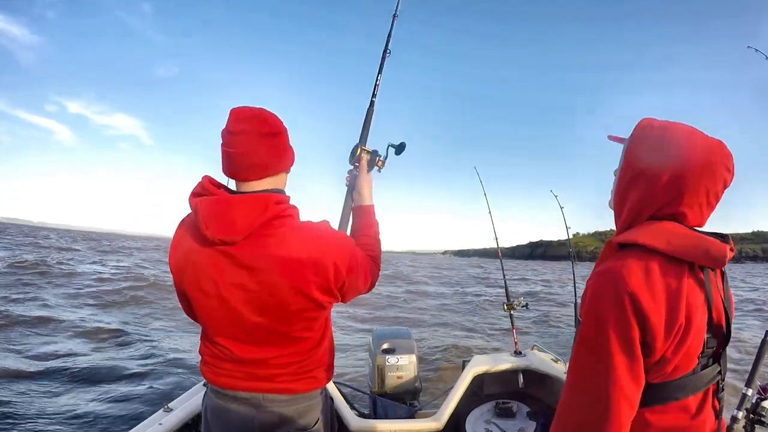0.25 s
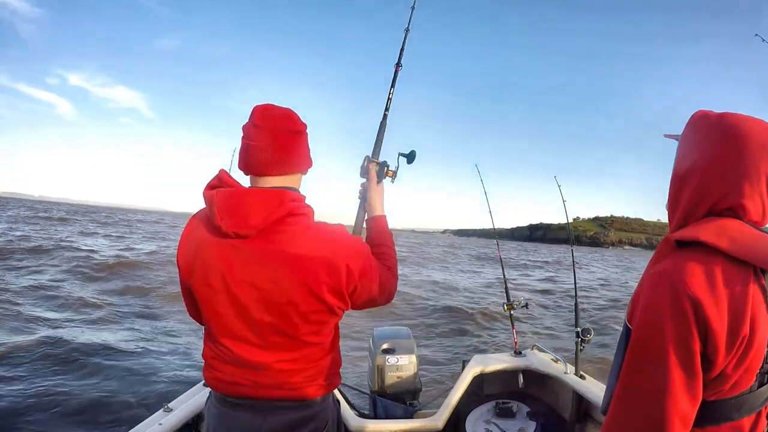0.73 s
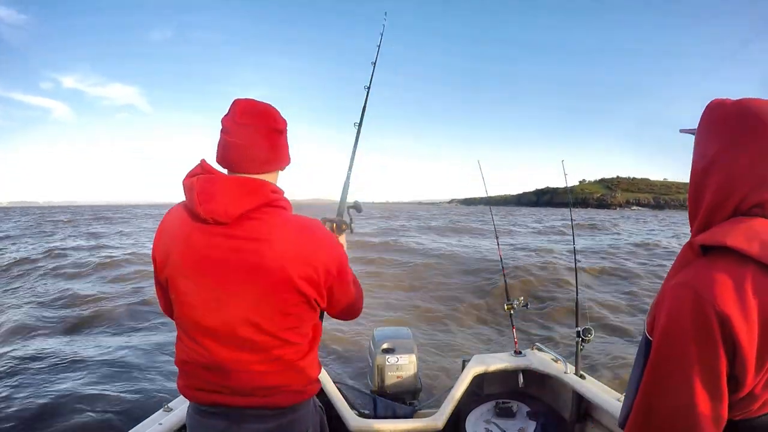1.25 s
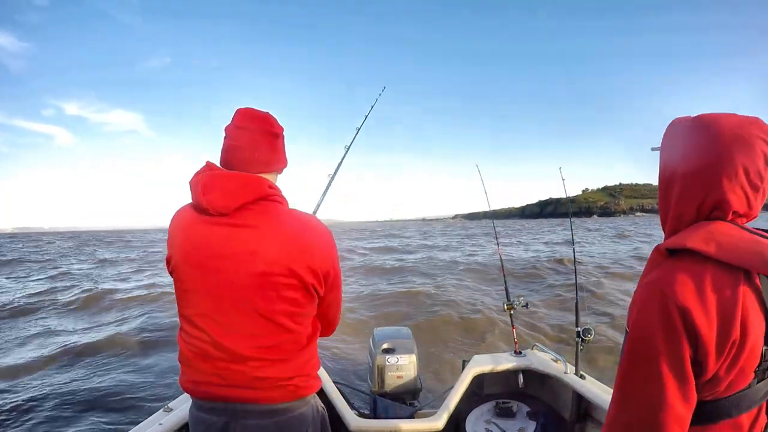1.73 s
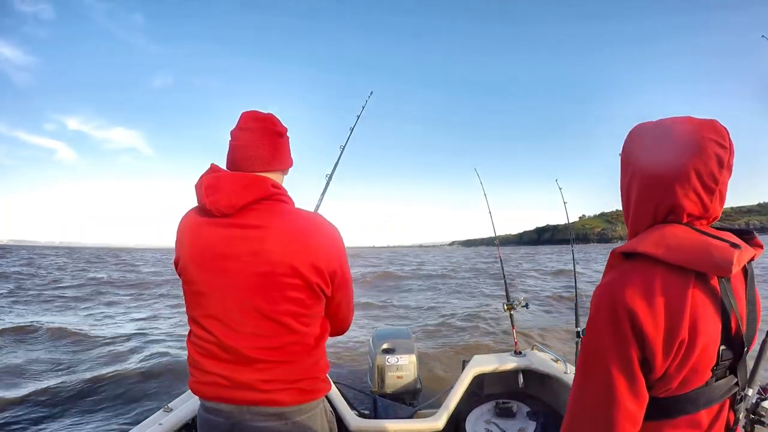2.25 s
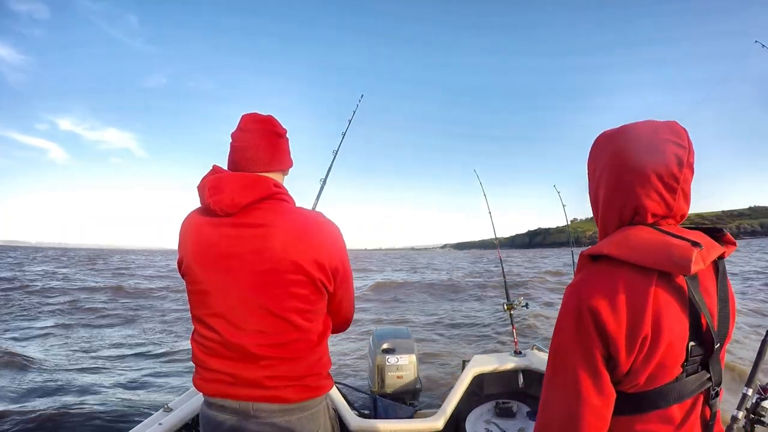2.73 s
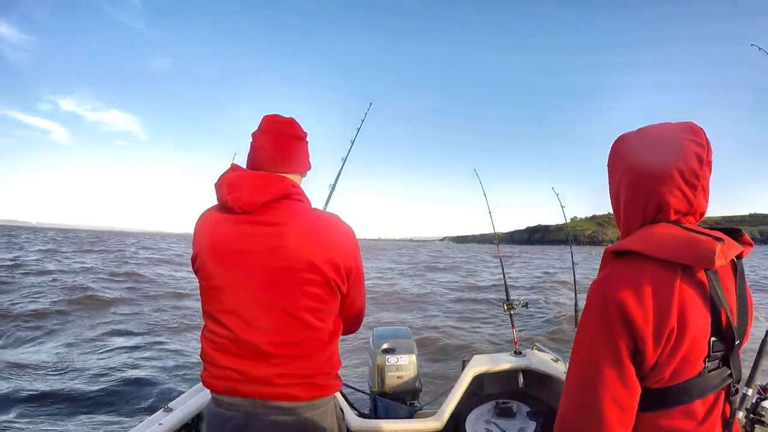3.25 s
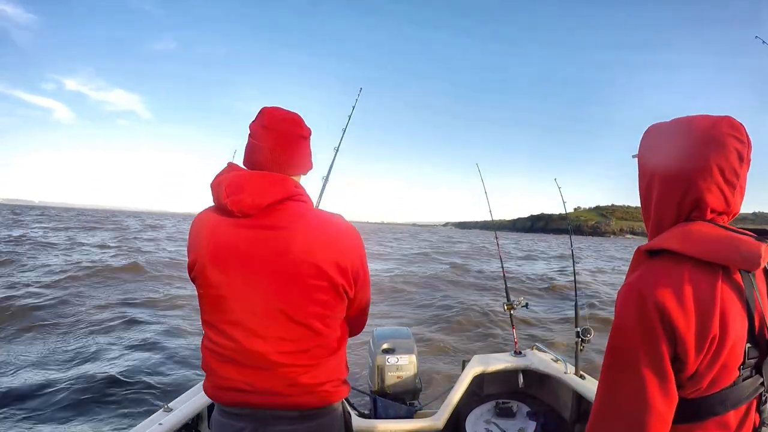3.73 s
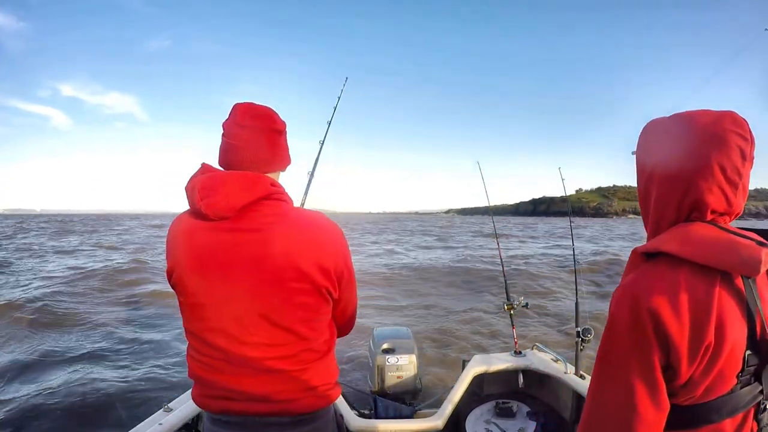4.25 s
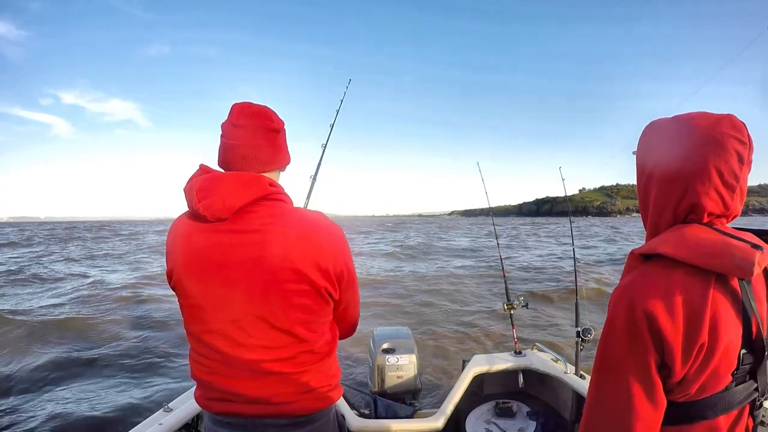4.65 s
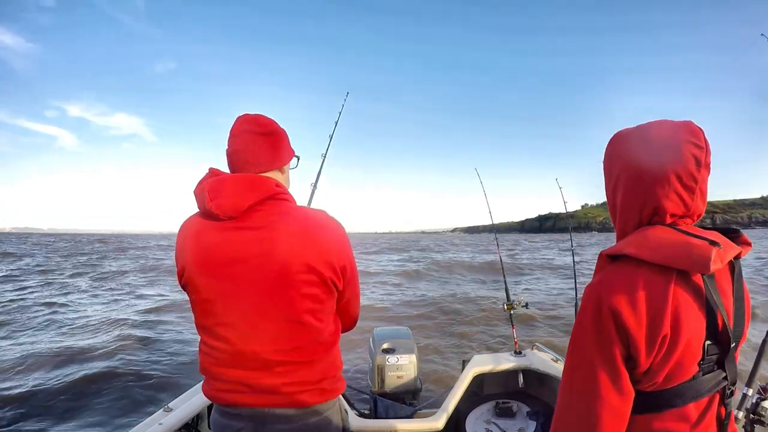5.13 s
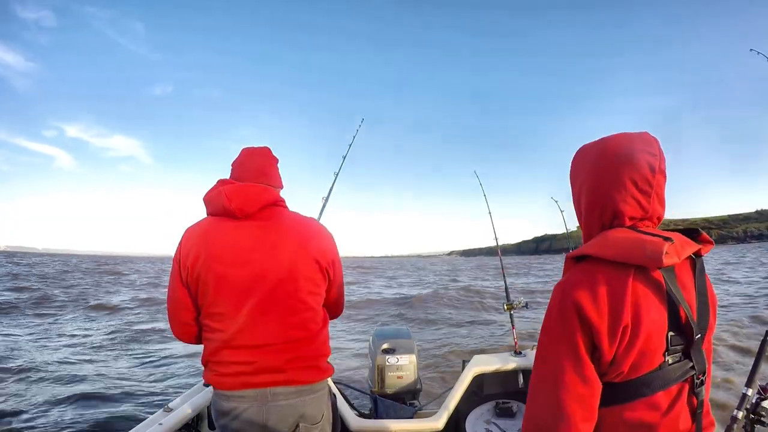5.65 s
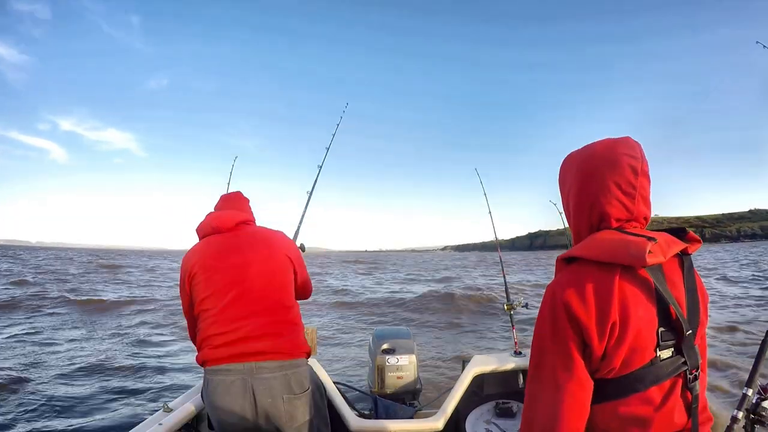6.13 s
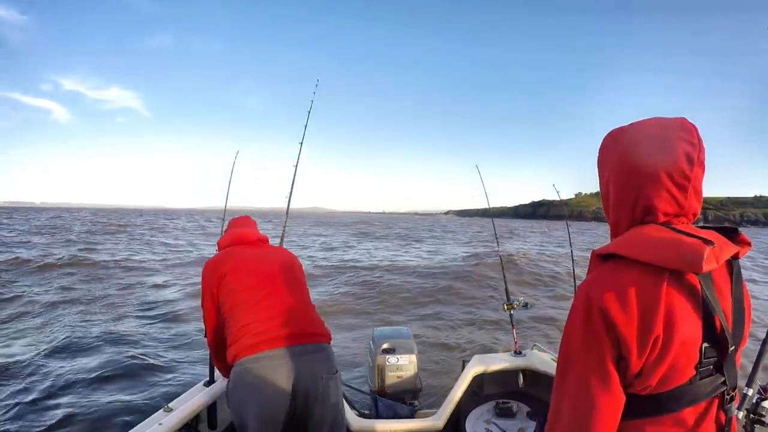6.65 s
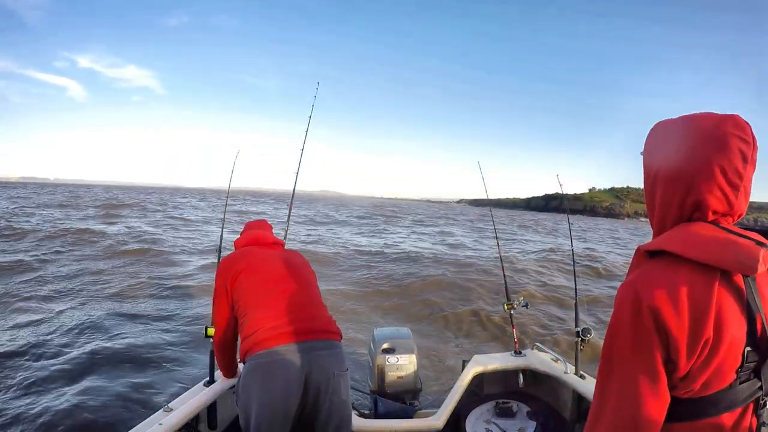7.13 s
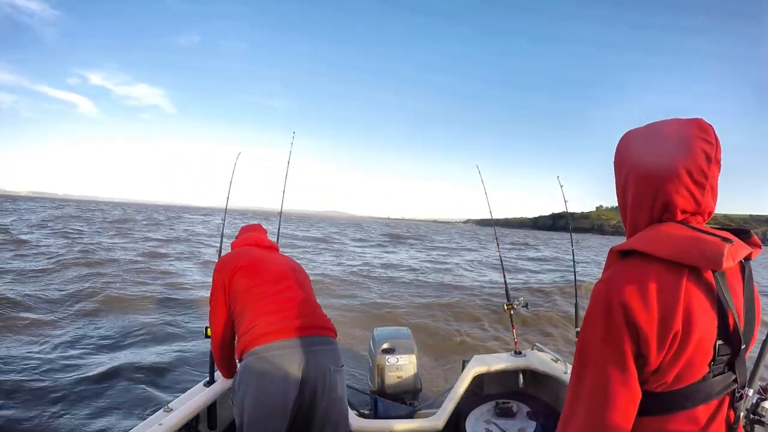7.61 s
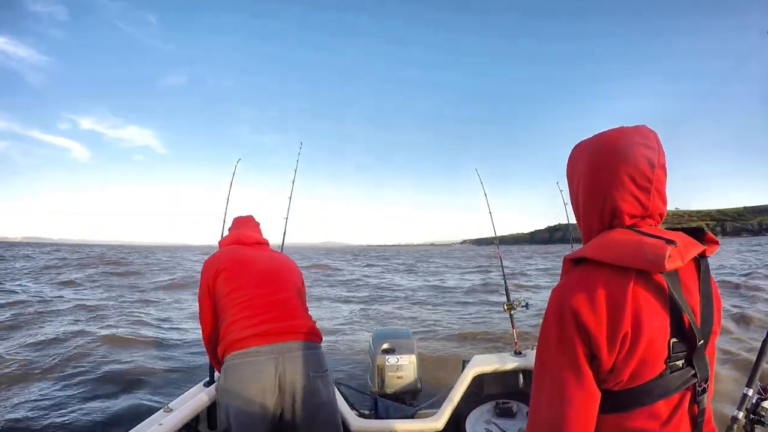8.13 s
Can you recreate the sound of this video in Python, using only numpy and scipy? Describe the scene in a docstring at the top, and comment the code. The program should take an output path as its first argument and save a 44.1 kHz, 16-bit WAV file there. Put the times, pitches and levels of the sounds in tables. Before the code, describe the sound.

Choppy water slaps a small boat's hull with deep booming thumps, while wind sputters on the microphone and one hard knock lands near the end.

```python
"""Waves slap a small boat on a windy day and keep its hull ringing: noise through a few low modes.
A cased microphone is fixed to the boat; gusts hiss and sputter as noise through the case resonances.
Thuds are puffs of dull noise, jolts damped swings, and a hard knock bounces on ringing modes.
Bubbles plop as dying sines, water laps in short gurgles, and a wash of coloured noise lies under all."""
import sys
import numpy as np
from scipy import signal
from scipy.fft import rfft, irfft, next_fast_len
from scipy.io import wavfile
from scipy.ndimage import uniform_filter1d

SR = 44100
rng = np.random.default_rng(int(sys.argv[2]) if len(sys.argv) > 2 else 0)


def materialize(psi):
    """Save the field psi as 16-bit PCM at rate SR to the path in sys.argv[1].

    A 1-D psi becomes a single channel; in a 2-D psi each row is a channel.
    """
    bounded = np.clip(np.atleast_2d(psi).T, -1, 1)
    quanta = np.round(bounded * 32767).astype(np.int16)
    wavfile.write(sys.argv[1], SR, quanta)


def attenuation_scalar(level_db):
    """Turn a level in dB into a linear amplitude multiplier (20 dB per decade)."""
    decades = np.asarray(level_db, float) / 20
    return 10 ** decades


N = 369558

# Waves slapping the hull. Each row: peak time in seconds, then drive in dB of the boom, floor,
# large panel, middle panel and small panel.
SLAPS = [(0.11, -22, -28, -39.5, -53, -45), (0.149, -16, -18.5, -30, -47.5, -45.5),
         (0.29, -27, -28.5, -58, -68, -59), (0.37, -27.5, -44, -46, -58, -54.5),
         (0.489, -38, -33, -33.5, -47, -52), (0.77, -44, -56, -42, -60, -56.5),
         (1.14, -54, -31.5, -49, -42.5, -57), (1.38, -59, -65, -72, -50.5, -50.5),
         (1.69, -45, -32, -36.5, -42, -55), (1.74, -17.5, -24.5, -48, -45, -49.5),
         (1.83, -12, -46, -54, -58, -58), (1.93, -21, -40.5, -48, -64, -59),
         (2.02, -34, -28.5, -52, -52.5, -57.5), (2.36, -36, -43, -44, -51.5, -55.5),
         (2.63, -32.5, -39, -51, -64, -79), (3.02, -30, -39.5, -56, -57, -56),
         (3.41, -51, -43.5, -45.5, -69, -68), (3.58, -54, -33.5, -49, -63, -75),
         (3.68, -28.5, -30, -44, -53, -58), (4.25, -54, -40.5, -59, -44.5, -56),
         (4.36, -40, -34.5, -69, -48.5, -62), (4.9, -57, -33.5, -68, -69, -64),
         (5.02, -52, -64, -64, -71, -47.5), (5.28, -40, -36.5, -49, -70, -62.5),
         (5.51, -34.5, -32, -46, -64, -60), (5.75, -42, -36.5, -57, -53, -62),
         (6.28, -36, -39.5, -65, -55, -76), (6.54, -32, -41, -68, -71, -76),
         (6.86, -36, -21.5, -33, -46.5, -53), (6.93, -27.5, -29, -49, -37, -58),
         (7.18, -31, -43, -49, -64, -73), (7.31, -49, -39.5, -41, -61, -75),
         (7.44, -46, -34.5, -43, -57, -80), (7.637, -24, -18.5, -31, -29, -43.5),
         (7.675, -18.5, -15, -48.5, -39, -50), (7.75, -19, -19.5, -51, -49, -61),
         (8.05, -34, -37.5, -52, -52, -67), (8.29, -39.5, -35.5, -48, -61, -65)]


def rms_one(x):
    """Scales to rms 1."""
    return x / np.sqrt(np.mean(x ** 2) + 1e-20)


def in_time(rows):
    """Interpolates (s, value) rows at every sample."""
    s, value = np.transpose(rows)
    return np.interp(np.arange(N) / SR, s, value)


def drift(rate_hz):
    """Random wander of rms 1: noise through two equal low-pass poles at rate_hz."""
    step = 40   # samples between drawn points
    r = np.exp(-2 * np.pi * rate_hz * step / SR)
    noise = rng.standard_normal(N // step + 2002)
    slow = signal.lfilter([1], [1, -2 * r, r * r], noise)[2000:]
    return np.interp(np.arange(N) / step, np.arange(len(slow)), rms_one(slow))


def resonance(x, hz, width_hz):
    """Two-pole resonance with gain 1 on top."""
    r = np.exp(-np.pi * width_hz / SR)
    zeros = np.array([1, 0, -1]) * (1 - r * r) / 2
    return signal.lfilter(zeros, [1, -2 * r * np.cos(2 * np.pi * hz / SR), r * r], x)


def resonance_twice(x, hz, width_hz):
    """Two equal resonances in series; width_hz is that of each."""
    return resonance(resonance(x, hz, width_hz), hz, width_hz)


def colour(x, spectrum):
    """Shapes white noise to relative (Hz, dB per Hz) rows; rms 1."""
    size = next_fast_len(N)
    hz, level_db = np.transpose(spectrum)
    log_hz = np.log(np.fft.rfftfreq(size, 1 / SR) + 1)
    gain = attenuation_scalar(np.interp(log_hz, np.log(hz), level_db))
    return rms_one(irfft(rfft(x, size) * gain, size)[:N])


def muffle(x, hz):
    """Steep low-pass."""
    return signal.sosfilt(signal.butter(8, hz, fs=SR, output="sos"), x)


def notched(x):
    """Narrow gap between two case resonances: part of one band is subtracted."""
    return x - 0.64 * resonance(x, 3290, 150)


def puff(start_s, rise_s, fall_s):
    """Envelope that rises fast and dies away, peaking below 1."""
    t = np.maximum(np.arange(N) / SR - start_s, 0)
    return (1 - np.exp(-t / rise_s)) * np.exp(-t / fall_s)


def slapped(rows, column, rise_db_per_s, fall_db_per_s):
    """Drive from a row of blows: swells to each peak, steady ring-downs, powers summed."""
    t, power = np.arange(0, N + 40, 40) / SR, 0
    for row in rows:
        rise_db = rise_db_per_s * (t - row[0])
        fall_db = fall_db_per_s * (row[0] - t)
        power = power + attenuation_scalar(row[column] + np.minimum(rise_db, fall_db)) ** 2
    return np.interp(np.arange(N) / SR, t, np.sqrt(power))


def hull(steadiness=0.78):
    """Modes ring as noise through doubled resonances; each swing's own level is partly evened."""
    # One list each for sway, boom, floor, large, middle and small panel.
    # Each row in a list: mode in Hz, width of each pass in Hz, relative level in dB.
    hull_modes = [
        [(28.37, 6.8, 1), (33.54, 8.8, -7)],
        [(50, 23, -15.5), (65.44, 7.8, -0.8)],
        [(113.87, 11.8, -3.5), (125.1, 9.9, 0)],
        [(165.4, 17, 1)],
        [(205.7, 11.3, 1), (261, 74, -11)],
        [(312.3, 36, 2)],
    ]
    # Slowest sway, surging with each passing wave. Each row: peak time in seconds, drive in dB.
    sway_surges = [(0.15, -20.5), (0.43, -22), (0.69, -31), (0.89, -29), (1.22, -29), (1.52, -29.5),
                   (1.74, -34), (2.05, -31), (2.39, -24.5), (2.93, -23.5), (3.06, -32), (3.2, -26),
                   (3.52, -31.5), (3.68, -33.5), (4.08, -30), (4.42, -27.5), (4.59, -27), (4.83, -37.5),
                   (5.02, -31.5), (5.17, -33), (5.3, -37.5), (5.51, -27.5), (5.78, -26.5), (6.02, -30),
                   (6.24, -29.5), (6.5, -31.5), (6.64, -25.5), (6.93, -26), (7.24, -24), (7.5, -38),
                   (7.66, -26.5), (7.86, -28), (8.11, -26), (8.3, -30.5)]
    # Response of each part, boom to small panel. Each row: mean calm drive between slaps in dB,
    # rise in dB per s, ring-down in dB per s.
    part_responses = [(-43, 504, 131), (-48, 504.5, 170), (-58.5, 502, 215), (-61, 501, 216),
                      (-70, 491.5, 299.5)]
    # Where waves land sets which floor mode leads. Each row: seconds, upper over lower mode in dB
    # (added to their own levels).
    floor_lean = [(0, 6), (0.3, 1.5), (0.5, 3), (1.2, 8), (1.75, 1), (2.05, 0.5), (2.9, 4.5), (3.7, 3.5),
                  (4.3, -4.5), (4.9, 4.5), (5.5, -4.5), (6.3, 5), (6.9, -0.5), (7.4, 13.5), (7.62, -12.5),
                  (7.9, -5), (8.38, 4.5)]
    chop_db, chop_hz = 2.5, 5   # small waves make the calm drive wander

    drives = [slapped(sway_surges, 1, 86, 75)]
    for column, (calm_db, rise, fall) in enumerate(part_responses, 1):
        calm = attenuation_scalar(calm_db + chop_db * drift(chop_hz))
        drives.append(np.hypot(calm, slapped(SLAPS, column, rise, fall)))

    out, lean_db = np.zeros(N), in_time(floor_lean)
    for part, (drive, modes) in enumerate(zip(drives, hull_modes)):
        for k, (hz, width_hz, level_db) in enumerate(modes):
            if part == 2:   # floor
                level_db = level_db + (k - 0.5) * lean_db
            noise = rng.standard_normal(N + SR)
            swing = rms_one(resonance_twice(noise, hz, width_hz)[SR:])
            two_cycles = int(2 * SR / hz)
            height = np.sqrt(uniform_filter1d(swing ** 2, two_cycles) + 0.045)
            out += drive * attenuation_scalar(level_db) * rms_one(swing / height ** steadiness)
    return out


def gusts(low_flutter_db=-1.0, high_flutter_db=3.5, own_db=2.0, spit_per_s=200, spit_db=13):
    """Turbulence at the case opening flutters, sputters and rings the case resonances."""
    # Case resonances. Each row: Hz, width in Hz before widening, relative level in dB.
    case_low = [(1635, 246, 1), (1872, 79, 9.5), (1934, 400, -2), (2310, 700, -6)]
    case_high = [(2635, 274, 0.5), (3064, 133, 4), (3594, 482, 6.5), (3717, 453, 5)]
    # Gusts. Each row: start in s, length in s, low hiss in dB, high hiss in dB, before flutter.
    gust_rows = [(-0.1, 0.23, -62.5, -97), (0.385, 0.29, -59, -76), (0.62, 0.32, -66, -94),
                 (1.026, 0.13, -69, -93), (1.547, 0.28, -61.5, -74), (1.96, 0.29, -60, -76.5),
                 (2.345, 0.37, -62, -69), (2.73, 0.065, -70, -64), (3.1, 0.27, -82, -73.5),
                 (3.62, 0.23, -64.5, -76), (4.15, 0.18, -60, -55.5), (4.332, 0.28, -61.5, -56),
                 (4.612, 0.12, -57, -67), (5.398, 0.12, -62, -79), (5.832, 0.055, -62, -67),
                 (5.934, 0.14, -56.5, -65.5), (6.3, 0.19, -71, -74.5), (6.71, 0.21, -57.5, -58),
                 (6.97, 0.28, -64, -62.5), (7.39, 0.21, -75, -71), (8.248, .3, -55, -66)]
    # Sputters. Each row: start in s, low level in dB, high level in dB (before shaping),
    # length scale in s.
    sputter_rows = [(0.092, -48, -64, 0.028), (0.118, -37.5, -62, .014), (0.145, -27.5, -54, 0.0076),
                    (0.176, -71, -51, 0.014), (0.208, -57, -53.5, 0.031), (0.42, -47.5, -83, 0.015),
                    (0.504, -54, -58, 0.064), (0.556, -58, -53, 0.039), (1.148, -46, -45, 0.0087),
                    (1.329, -58, -77, 0.011), (1.554, -78, -49.5, 0.029), (1.736, -46, -72, 0.0074),
                    (2.021, -77, -49.5, 0.023), (2.345, -63.5, -48, 0.013), (2.363, -59, -44, 0.028),
                    (2.39, -61, -43.5, 0.025), (2.417, -69, -53, 0.034), (2.483, -64, -46, 0.018),
                    (2.506, -65, -31.5, 0.0095), (2.524, -77, -54, 0.022), (2.56, -64, -54, 0.082),
                    (2.783, -76, -53, 0.029), (2.965, -48, -54, 0.04), (3.019, -49.5, -46, 0.03),
                    (3.059, -57, -52, 0.031), (3.112, -46, -33.5, 0.009), (3.773, -70, -54, 0.015),
                    (3.834, -70, -52, 0.013), (3.882, -76, -60, 0.03), (4.155, -53, -62, 0.03),
                    (4.274, -52, -47, 0.011), (4.433, -62, -47, 0.008), (4.547, -64, -49, 0.01),
                    (4.588, -66, -44, 0.01), (4.644, -68, -46.5, 0.016), (5.124, -68, -54, 0.011),
                    (5.224, -59, -79, 0.045), (5.445, -70, -60, 0.045), (5.807, -66, -53, 0.0077),
                    (5.847, -69, -43.5, 0.012), (5.882, -47.5, -54, 0.021), (5.932, -66, -45, 0.015),
                    (5.953, -77, -53.5, 0.082), (6.137, -57, -57, 0.024), (6.246, -57, -63, 0.019),
                    (6.308, -75, -55, 0.022), (6.764, -54, -45.5, 0.054), (6.855, -74, -48.5, 0.036),
                    (6.961, -63, -46, 0.033), (6.99, -55, -46.5, 0.039), (7.094, -57, -46.5, 0.023),
                    (7.684, -48, -51.5, 0.032), (8.217, -64, -48.5, 0.018), (8.255, -57, -41.5, 0.027),
                    (8.284, -69, -48, 0.067)]
    breeze_db, edge_s = [[-71], [-72.5]], 0.098   # low and high hiss between gusts; gust ramp time
    widening = 1.96   # for the two passes
    case_top_hz, spill_hz, spill_width_hz, spill_db = 4450, 5240, 1200, 2

    now, shared = np.arange(N) / SR, drift(62)
    blow = attenuation_scalar(breeze_db) * np.ones(N)
    for start, length, low_db, high_db in gust_rows:
        inside_s = np.minimum(now - start, start + length - now)
        hold = np.clip(inside_s / edge_s + 0.5, 0, 1)
        blow = blow + attenuation_scalar([[low_db], [high_db]]) * hold

    bursts = np.zeros((2, N))
    for start, low_db, high_db, length in sputter_rows:
        part = slice(int(start * SR), int((start + 0.1) * SR))
        t = now[part] - start
        swell = np.exp(-((t - 0.34 * length) / (0.52 * length)) ** 2)
        onset = 1 - np.exp(-np.maximum(t, 0) / 0.0076)
        bursts[:, part] += attenuation_scalar([[low_db], [high_db]]) * swell * onset

    out = np.zeros(N)
    bands = zip(blow, bursts, (case_low, case_high), (low_flutter_db, high_flutter_db))
    for level, burst, modes, flutter_db in bands:
        # droplets tick in the hiss
        spit = attenuation_scalar(spit_db + 3.0 * np.minimum(rng.exponential(1, N), 3))
        air = rng.standard_normal(N) * (1 + spit * (rng.random(N) < spit_per_s / SR))
        rung = np.zeros(N)
        for k, (hz, width_hz, level_db) in enumerate(modes):
            rung += (-1) ** k * attenuation_scalar(level_db) * resonance_twice(air, hz, widening * width_hz)
        flutter = attenuation_scalar(flutter_db * shared + own_db * drift(89))
        out += (level * flutter + burst) * rms_one(rung)
    spill = attenuation_scalar(spill_db) * resonance_twice(out, spill_hz, spill_width_hz)
    return muffle(notched(out), case_top_hz) + spill


def thuds():
    """A soft blow on the hull is a short puff of dull noise."""
    # Each row: start in seconds, level in dB before the puff, fall time in seconds.
    thud_rows = [(0.1, -40.5, 0.045), (0.133, -26.5, 0.051), (1.108, -51, 0.022), (1.7, -46, 0.049),
                 (1.732, -38, 0.042), (1.74, -31.5, 0.021), (1.816, -40.5, 0.044), (2.334, -41, 0.087),
                 (4.201, -37, 0.021), (6.89, -30, 0.049), (7.622, -27.5, 0.11)]
    # Thud spectrum. Each row: Hz, relative dB per Hz.
    thud_spectrum = [(110, -29.5), (180, 14.5), (268, -33), (348, -9.5), (408, -18.5), (1430, -31.5),
                     (1720, -24), (3500, -44), (4550, -84.5), (7700, -120)]
    shape = sum(attenuation_scalar(level_db) * puff(s, 0.0014, fall_s) for s, level_db, fall_s in thud_rows)
    return shape * colour(rng.standard_normal(N), thud_spectrum)


def jolts():
    """The hardest blows shove the mount: one or two deep swings, heavily damped."""
    # Each row: start in seconds, level in dB before the puff.
    jolt_rows = [(0.144, -13.5), (1.744, -12.5), (7.655, -10)]
    swing_hz, rise_s, fall_s = 53.3, 0.0031, 0.017
    now, out = np.arange(N) / SR, np.zeros(N)
    for s, level_db in jolt_rows:
        swing = np.sin(2 * np.pi * swing_hz * (now - s))
        out -= attenuation_scalar(level_db) * puff(s, rise_s, fall_s) * swing
    return out


def knocks():
    """Each contact clicks every mode with its own strength and adds a rough burst of noise."""
    # Contacts of the knock and its bounce. Each row: seconds, strength in dB.
    contacts = [(7.6332, -43), (7.6477, -31), (7.6502, -25), (7.656, -50.5)]
    # Modes struck. Each row: Hz, relative strike in dB, t60 in seconds.
    knock_modes = [(650, -2, 0.03), (770, -7, 0.023), (967, 6.5, 0.029), (1130, 2, 0.038), (1420, 5, 0.043),
                   (1605, -2.5, 0.045), (1820, 6.5, 0.055), (2170, 8, 0.017), (2654, 12.5, 0.022),
                   (3190, -3.5, 0.021), (3780, -13, 0.036), (4380, -9, .012), (4790, -15, 0.014),
                   (5170, -4, 0.011), (6620, -34.5, 0.011), (7580, -17, 0.012), (9800, -31, 0.005)]
    build_hz = 2000   # modes below this swell more slowly before they die
    crack_db, crack_fall_s = -7.5, 0.011   # crack level over contact strength, before the puff

    at = [round(s * SR) for s, _ in contacts]
    strength_db = np.array(contacts)[:, 1]
    out = np.zeros(N)
    for k, (hz, level_db, t60_s) in enumerate(knock_modes):
        clicks = np.full(N, 1e-18)
        clicks[at] = (-1) ** k * attenuation_scalar(strength_db + level_db + rng.normal(0, 1.2, len(at)))
        # a narrower resonance softens the start of a lower mode
        soft_hz = 0.58 * hz * min(hz / build_hz, 1) ** 1.7
        soft = resonance_twice(clicks, hz, soft_hz)
        r, w = attenuation_scalar(-60 / (t60_s * SR)), 2 * np.pi * hz / SR
        out += signal.lfilter([0, np.sin(w)], [1, -2 * r * np.cos(w), r * r], soft)
    crack = sum(attenuation_scalar(db + crack_db) * puff(s, 0.00083, crack_fall_s) for s, db in contacts)
    rough = rms_one(muffle(resonance(rng.standard_normal(N), 1300, 1420), 3630))
    return muffle(out, 11000) + crack * rough


def plops(cycles=14.4, climb=0.0076):
    """A trapped bubble rings as a dying sine that barely climbs."""
    # Each row: start in seconds, level in dB before the puff, pitch in Hz before the climb.
    plop_rows = [(0.028, -50, 890), (0.439, -51, 917), (0.527, -47.5, 900), (1.223, -51, 2400),
                 (1.462, -53, 1080), (1.575, -46, 910), (1.613, -40, 2250), (3.396, -52, 940),
                 (3.635, -49, 920), (5.676, -48, 2130), (5.678, -47, 2430), (6.239, -49, 2650),
                 (6.247, -54, 1130), (6.599, -54, 884), (7.603, -50, 920)]
    out = np.zeros(N)
    for s, level_db, hz in plop_rows:
        t = np.maximum(np.arange(N) / SR - s, 0)
        fall_s = cycles / hz
        turns = hz * t * (1 + climb * np.minimum(t / fall_s, 4))
        out += attenuation_scalar(level_db) * puff(s, 0.0012, fall_s) * np.sin(2 * np.pi * turns)
    return out


def lapping(per_s=700, cycles=5.6, spread_db=1.5):
    """Water gurgles on the hull: random clicks ring resonances spread in pitch."""
    # Each row: seconds, mean gurgle level in dB.
    lapping_levels = [(0, -74), (0.5, -60.5), (0.8, -73.5), (1.5, -68.5), (2.0, -66.5), (2.8, -67.5),
                      (3.7, -68.5), (4.5, -61.5), (5.1, -75), (5.6, -73), (6.6, -64.5), (7.4, -64),
                      (7.95, -71), (8.38, -63)]
    splash_db, splash_fall_db_per_s = -4.5, 153
    # only a slap that shakes both the large and the small panel splashes
    large = slapped(SLAPS, 3, 400, splash_fall_db_per_s)
    small = slapped(SLAPS, 5, 400, splash_fall_db_per_s)
    splash = attenuation_scalar(splash_db) * np.minimum(large, small)

    sizes = attenuation_scalar(spread_db * np.minimum(rng.exponential(1, N), 4)) * rng.choice([-1, 1], N)
    born, dealt = rng.random(N) < per_s / SR, rng.integers(0, 12, N)
    out = np.zeros(N)
    for k, hz in enumerate(np.geomspace(380, 1150, num=12)):
        clicks = sizes * born * (dealt == k) + 1e-18
        out += resonance_twice(clicks, hz, 1.77 * hz / cycles)
    calm = attenuation_scalar(in_time(lapping_levels) + 2.0 * drift(5.2))
    return np.hypot(calm, splash) * rms_one(muffle(out, 1540))


def wash():
    """Far water and wind: noise whose lower part breathes, with a faint high case mode."""
    # Each row: Hz, relative dB per Hz.
    wash_spectrum = [(24, -35.5), (40, -3.5), (55, -8), (80, -8), (136, -14), (253, -29.5), (316, -29.5),
                     (416, -36.5), (900, -39), (1280, -46), (1850, -38.5), (3720, -49.5), (4320, -50),
                     (12300, -59), (15400, -62.5)]
    noise = notched(colour(rng.standard_normal(N), wash_spectrum))
    lower = muffle(noise, 5040)
    breath = attenuation_scalar(2.56 * drift(9.2)) - 1
    return attenuation_scalar(-44) * (noise + breath * lower + 0.39 * resonance(noise, 5400, 430))


def scene():
    """All sources reach one microphone."""
    mix = hull() + gusts() + thuds() + jolts() + knocks() + plops() + lapping() + wash()
    return mix[None]


def low_pass(x):
    """Removes everything above the highest recorded frequency."""
    return signal.sosfilt(signal.butter(12, 15400, fs=SR, output="sos"), x)


def record(dry):
    """Stores the finished mix."""
    return low_pass(dry)


dry = scene()
out = record(dry)
materialize(out)
```